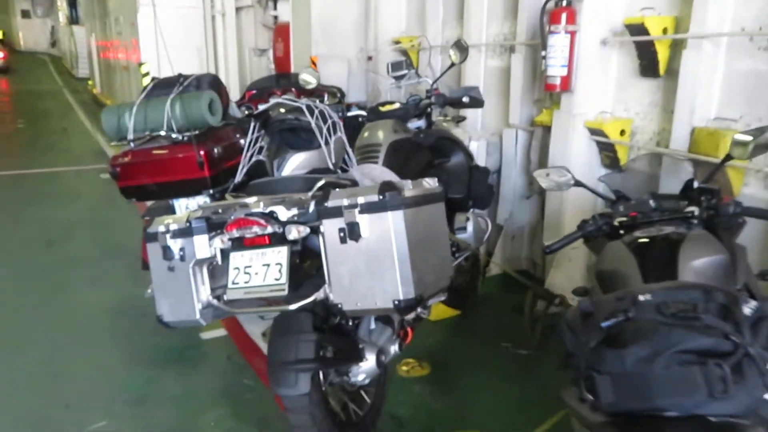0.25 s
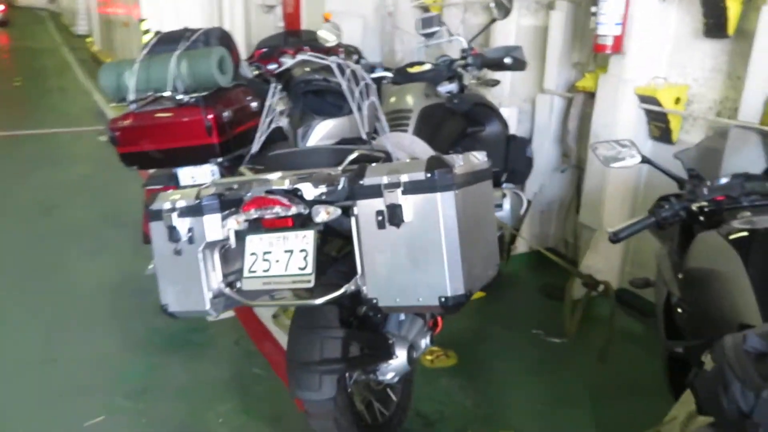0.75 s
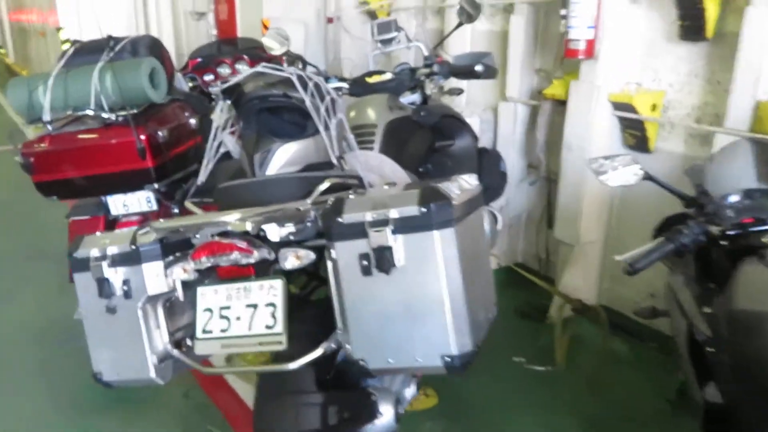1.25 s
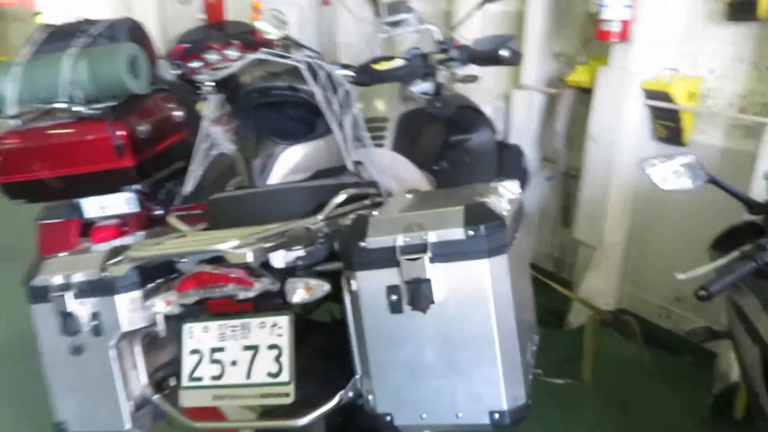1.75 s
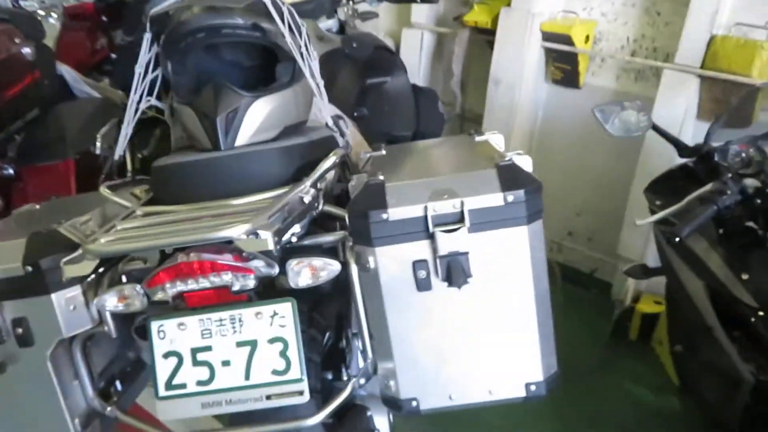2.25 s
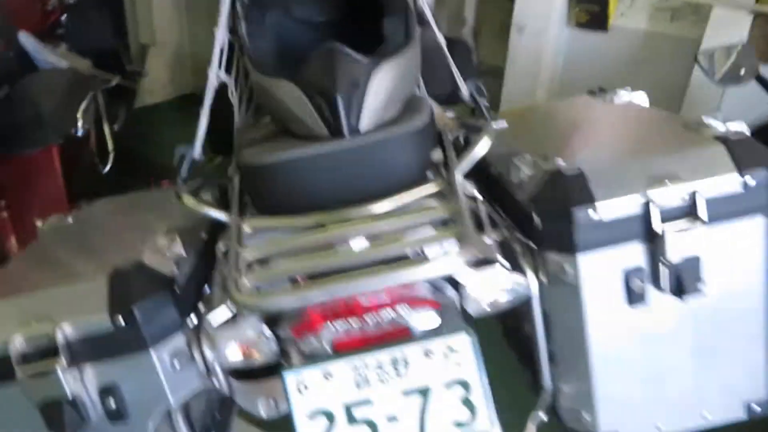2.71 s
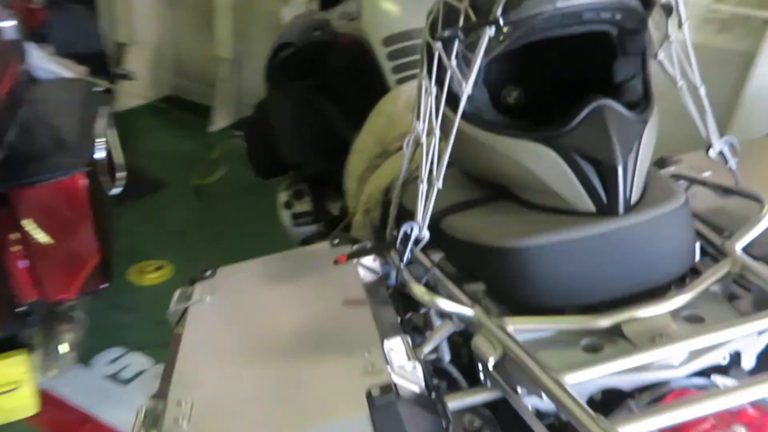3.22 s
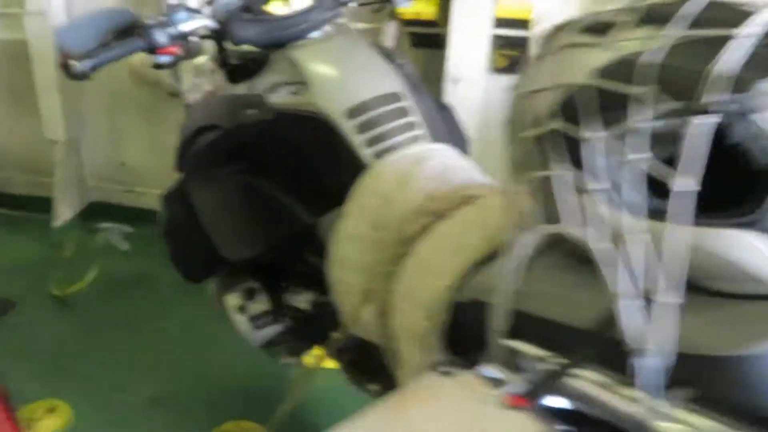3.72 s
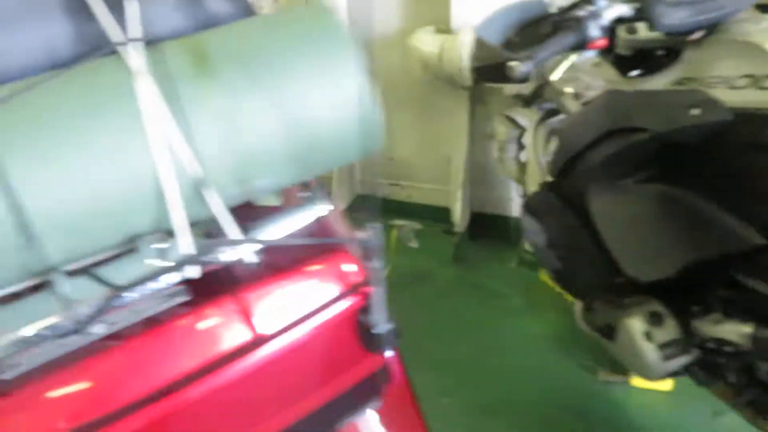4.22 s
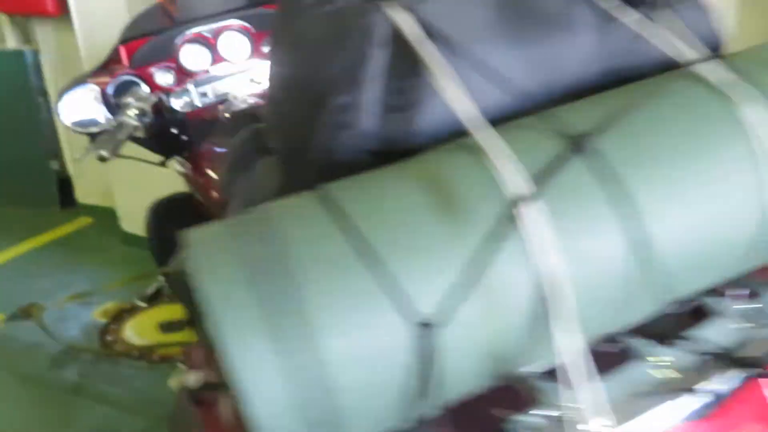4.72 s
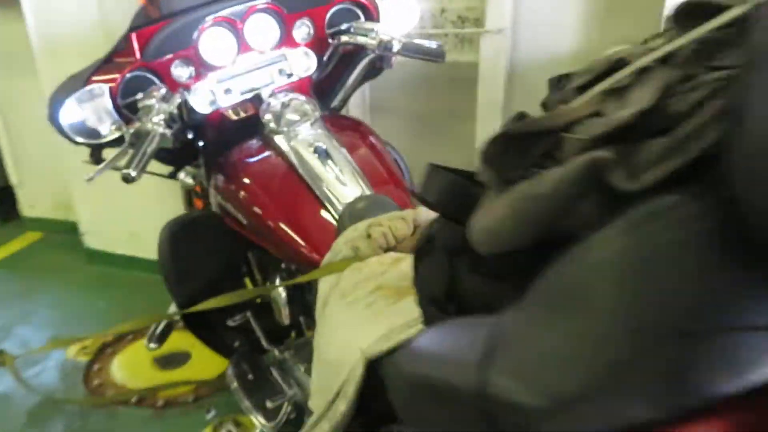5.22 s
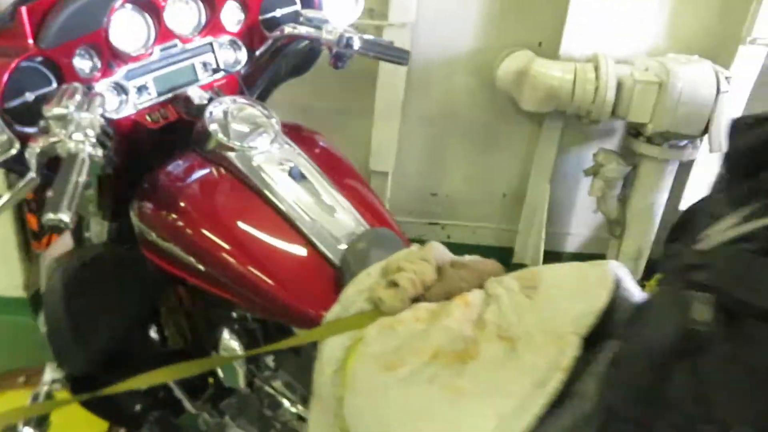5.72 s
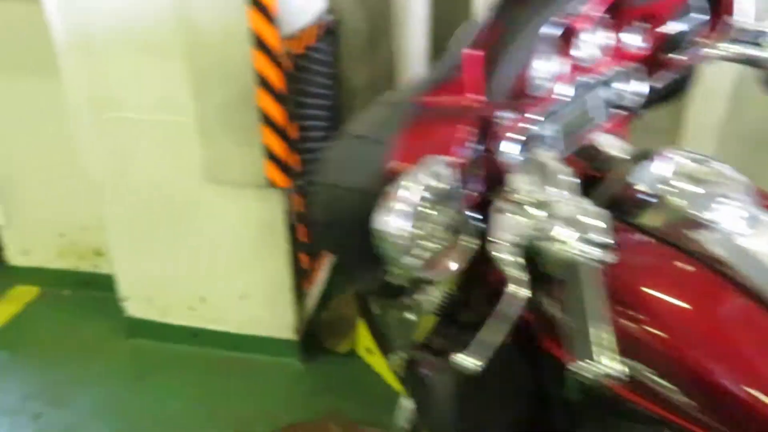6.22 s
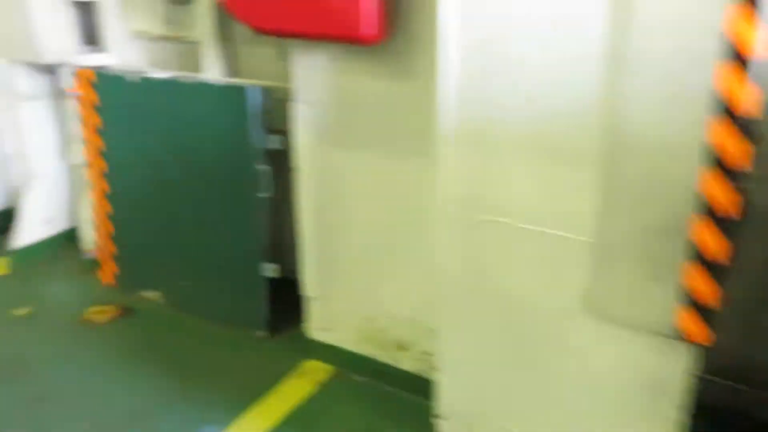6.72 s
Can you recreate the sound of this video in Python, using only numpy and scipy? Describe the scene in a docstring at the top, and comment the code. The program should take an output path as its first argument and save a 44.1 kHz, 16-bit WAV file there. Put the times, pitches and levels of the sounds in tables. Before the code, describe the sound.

Low, thick ship-engine noise dominates from start to end, throbbing irregularly in a reverberant metal hold. Above it sits a muffled ventilation roar with a thin air hiss. The handheld microphone is carried past silent parked motorcycles: a broader hollow air rush around three seconds, soft swishes, a tiny click at about 4.6 seconds, then steady rumble until an abrupt end.

```python
"""Enclosed steel vehicle deck of a ferry under way, heard from a small camera carried between parked motorcycles.
From the start, diesel firings smear into a rumble, booms and throbs; a drone swells between standing-wave nodes.
All through, shaped noise makes duct roar and air hiss; soft rustles and faint narrow-band swells start by 1 s.
Hollow duct openings and hissing grilles pass from about 2.7 s to 4.7 s; one dry, decaying tick falls at 4.6 s.
Throbs, rustles and treble swells near 8 kHz recur up to the short closing fade."""
import sys
import numpy as np
from scipy import signal
from scipy.fft import rfft, irfft
from scipy.io import wavfile
from scipy.ndimage import uniform_filter1d, minimum_filter1d

SR = 44100
rng = np.random.default_rng(int(sys.argv[2]) if len(sys.argv) > 2 else 0)


def master(y):
    """Save y as 16-bit WAV."""
    cut = np.clip(np.atleast_2d(y).T, -1, 1)
    pcm = np.round(cut * 32767)  # scale
    wavfile.write(sys.argv[1], SR, pcm.astype(np.int16))


N = 306620
TIME_S = np.arange(N) / SR
FREQ_HZ = np.maximum(np.arange(N // 2 + 1) * SR / N, 1)


def undb(db):
    """Decibels to amplitude gain."""
    return 10 ** (np.asarray(db) / 20)


def unit(x):
    """Scale to rms 1."""
    return x / np.sqrt(np.mean(x ** 2))


def gains(table):
    """Interpolate the dB columns of a time table into gains per sample."""
    time_s, *columns_db = np.transpose(table)
    return [undb(np.interp(TIME_S, time_s, column_db)) for column_db in columns_db]


def colour(points):
    """Frequency response through (f/Hz, level/dB) points, linear in dB over log frequency."""
    hz, db = np.transpose(points)
    return undb(np.interp(np.log(FREQ_HZ), np.log(hz), db))


def resonance(hz, width_hz):
    """Two identical resonators in series; width_hz is the bandwidth of each."""
    detuning = FREQ_HZ / hz - hz / FREQ_HZ
    return 1 / (1 + 1j * detuning * hz / width_hz) ** 2


def noise():
    """White noise of rms about 1."""
    return rng.standard_normal(N)


def wander(rate_hz):
    """Smooth random signal of rms 1: noise under a Gaussian low-pass, without its mean."""
    lowpass = np.exp(-(FREQ_HZ / rate_hz) ** 2)
    lowpass[0] = 0
    return unit(irfft(rfft(noise()) * lowpass, N))


def hum(hz, waver_rad):
    """Sine of rms 1 whose phase drifts among the reflections."""
    phase_drift = waver_rad * wander(rate_hz=6.8)
    return np.sqrt(2) * np.sin(2 * np.pi * (hz * TIME_S + rng.random()) + phase_drift)


# side response of the stereo picture: f/Hz, level/dB
SIDE_COLOUR = [(55, -9), (110, -8), (180, -2), (380, 3.5), (650, -1), (5000, 0.3), (14000, -0.5)]
PORT_SPACING_M, SOUND_SPEED_M_PER_S = 0.013, 343


def diffuse(source, response, directions=8):
    """Sound from all round the deck: two close ports agree in the bass and part in the treble; rms 1."""
    angles_rad = np.pi / 2 * (np.arange(directions) + .5) / directions
    lags_s = PORT_SPACING_M / SOUND_SPEED_M_PER_S * np.cos(angles_rad)
    likeness = np.mean(np.cos(2 * np.pi * np.outer(lags_s, FREQ_HZ)), axis=0)
    mid = irfft(rfft(unit(source)) * response * np.sqrt(1 + likeness), N)
    side = irfft(rfft(noise()) * response * colour(SIDE_COLOUR) * np.sqrt(1 - likeness), N)
    return unit(np.array([mid + side, mid - side]))


def held(x, seconds):
    """Even out a band's slow swells by its running rms; keep its quick flutter."""
    power = uniform_filter1d(np.mean(x ** 2, axis=0), int(seconds * SR), mode="wrap")
    return x / np.sqrt(power)


# engine rumble spectrum: f/Hz, relative level/dB
RUMBLE_COLOUR = [(15, -15), (26, -13), (38, -8.5), (50, -6), (90, 1.5), (128, -1.5), (170, 1), (220, 1),
                 (275, 0.24), (350, -3.5), (450, -8), (700, -26.5), (1500, -66)]
# deck resonances along the walk: t/s, deep relative level/dB, upper relative level/dB
BOOM_LEVELS = [(0.0, -30, -35), (1.1, -30, -30.5), (1.65, -34, -32), (2.2, -20.5, -34), (2.6, -41, -40),
               (3.1, -27, -28.5), (3.5, -28, -23.5), (4.1, -29, -32), (4.7, -23, -24.5), (5.3, -20, -24.5),
               (5.68, -22, -23.5), (6.2, -35, -30), (6.55, -21.5, -28.5), (6.95, -20, -27)]


def engines(rumble_gain):
    """Diesels shake the hull: a broad rumble plus two booming deck resonances."""
    shaking = firings()
    deep_gain, upper_gain = gains(BOOM_LEVELS)
    rumble = held(diffuse(shaking, colour(RUMBLE_COLOUR)), seconds=0.41)
    deep = held(diffuse(shaking, resonance(hz=64.4, width_hz=34)), seconds=0.78)
    upper = held(diffuse(shaking, resonance(hz=143.7, width_hz=44)), seconds=0.2)
    return (undb(2.0) * rumble_gain * rumble
            + undb(-2.0) * deep_gain * deep
            + undb(2.7) * upper_gain * upper)


CYCLE_HZ = 5.92


def firings(cylinders=6, uneven_db=3, scatter_db=6.5, deck_t60_s=2.35, turbulence_db=2):
    """Unequal cylinders fire in turn; the ringing steel deck smears the blows together."""
    firing_hz = CYCLE_HZ * cylinders
    index = np.arange(int(N / SR * firing_hz))
    cylinder_db = uneven_db * rng.standard_normal(cylinders)
    blow_db = cylinder_db[index % cylinders] + scatter_db * rng.standard_normal(len(index))
    blows = np.zeros(N)
    blows[(index * SR / firing_hz).astype(int)] = undb(blow_db)
    # each cylinder has its own path through the hull
    firing_cylinder = (TIME_S * firing_hz + .5).astype(int) % cylinders
    decay = undb(-60 * TIME_S / deck_t60_s)
    smeared = sum(rfft(blows * (firing_cylinder == k)) * rfft(noise() * decay) for k in range(cylinders))
    return unit(irfft(smeared, N)) + undb(turbulence_db) * noise()


# momentary deck resonances: t/s, f/Hz, half length to 1/e/s, rms level at peak/dB
THROBS = [(0.09, 75, 0.08, -19), (0.61, 270, 0.14, -25.5), (1.078, 68, 0.063, -20.5),
          (1.344, 318, 0.081, -27), (2.416, 255, 0.07, -20), (3.176, 136, 0.048, -17),
          (3.29, 250, 0.15, -27), (3.505, 67.7, 0.095, -18.5), (4.71, 140.6, 0.066, -17.5),
          (5.3, 63.8, 0.1, -19), (5.707, 141, 0.06, -18), (6.69, 70.7, 0.08, -25),
          (6.787, 270.8, 0.15, -22.5), (6.92, 129.4, 0.042, -21)]


def throbs(waver_rad=0.74):
    """A deck resonance builds up for a moment: a short note of unsteady pitch swells and dies."""
    out = 0
    for time_s, hz, length_s, db in THROBS:
        swell = np.exp(-((TIME_S - time_s) / length_s) ** 2)
        out = out + undb(db) * swell * hum(hz, waver_rad)
    return out


DRONE_HZ, FAN_HZ = 132.7, 325.6
# fan hum: first crest, crest spacing, Gaussian sigma, crest level
FAN_CREST_S, FAN_SPACING_S, FAN_SIGMA_S, FAN_CREST_DB = 1.33, 3.18, 0.14, -24.5


def drone(drone_patchy_db=0.45, fan_trough_db=-33.5, fan_patchy_db=2.0):
    """Strongest engine order and a lesser fan hum, each swelling at its own crests."""
    engine_gain = undb(-1.77) * standing_wave() * undb(drone_patchy_db * wander(rate_hz=7))
    engine = engine_gain * hum(DRONE_HZ, waver_rad=.14)
    from_crest_s = (TIME_S - FAN_CREST_S + FAN_SPACING_S / 2) % FAN_SPACING_S - FAN_SPACING_S / 2
    fan_crest = undb(FAN_CREST_DB) * np.exp(-.5 * (from_crest_s / FAN_SIGMA_S) ** 2)
    fan_gain = np.hypot(fan_crest, undb(fan_trough_db)) * undb(fan_patchy_db * wander(rate_hz=16))
    return engine + fan_gain * hum(FAN_HZ, waver_rad=.25)


# drone standing wave: node t/s, relative level of the crest that follows/dB
DRONE_NODES = [(-0.2, -17), (0.39, -26), (0.88, -20), (1.31, -13.5), (1.93, -18), (2.61, -24.5),
               (3.22, -19), (4.42, -21), (4.97, -21), (5.38, -20), (5.84, -20.5)]
LAST_NODE_S = 6.72


def standing_wave(travelling_db=-30, crest_shape=0.77):
    """Drone gain: a broad arch from node to node, over a weak travelling part."""
    nodes_s, crest_db = np.transpose(DRONE_NODES)
    place = np.interp(TIME_S, np.append(nodes_s, LAST_NODE_S), np.arange(len(nodes_s) + 1))
    crest = undb(crest_db)[np.minimum(place.astype(int), len(nodes_s) - 1)]
    arch = np.abs(np.sin(np.pi * place)) ** crest_shape
    return np.hypot(crest * arch, undb(travelling_db))


# machinery tones: f/Hz, rms level at start/dB, rms level at end/dB
MACHINE_TONES = [(33, -45, -38), (38.7, -40, -34.5), (70.5, -38.5, -28.5), (76.3, -35, -42),
                 (114, -40.5, -31.5), (177.8, -29.5, -33), (218.8, -42.5, -31.5), (261.3, -38, -36),
                 (283.3, -33.5, -37), (304.5, -37.5, -37.5), (348.7, -41, -40)]


def machinery(fading=0.36):
    """Weaker tones of shafts, pumps and fans; reflections make each fade on its own."""
    out = 0
    for hz, start_db, end_db in MACHINE_TONES:
        reflections = 1 + fading * (wander(rate_hz=2.8) + 1j * wander(rate_hz=1.1))
        tone = np.real(reflections * np.exp(2j * np.pi * (hz * TIME_S + rng.random())))
        out = out + unit(tone) * undb(np.linspace(start_db, end_db, N))
    return out


# fan roar spectrum: f/Hz, relative level/dB
ROAR_COLOUR = [(150, -31), (350, -3), (460, 0), (605, 1), (652, 3), (700, 0.5), (800, -2.5), (950, -4.5),
               (1200, -10.5), (1500, -14.5), (1900, -21), (3000, -30.5), (6000, -53)]
# air hiss spectrum: f/Hz, relative level/dB
HISS_COLOUR = [(500, -24), (1400, 6.5), (2000, 5), (3200, -1), (4200, -4.5), (5200, -9), (7000, -14.5),
               (8400, -17.5), (9300, -20), (11500, -23), (14800, -36), (16000, -44)]
# duct resonances: f/Hz, width per resonator/Hz, relative level/dB
DUCT_MODES = [(934, 580, 3.5), (1300, 160, 3.5), (1460, 350, -1)]
# passing air openings: nearest t/s, distance/m, half width/m, hollow level/dB, relative hiss level/dB
OPENINGS = [(2.72, 0.09, 0.11, -27, -56), (3.1, 0.2, 0.12, -34.5, -62.5), (3.5, 0.44, 0.073, -48, -42.5),
            (4.65, 0.072, 0.024, -31, -53.5)]


def ventilation(roar_gain, hiss_gain):
    """Fans roar through the ducts, air hisses at the grilles, hollow openings go by."""
    hollow_gain = grille_gain = 0
    for time_s, distance_m, half_width_m, hollow_db, hiss_db in OPENINGS:
        nearness = passing(time_s, distance_m, half_width_m)
        hollow_gain = hollow_gain + undb(hollow_db) * nearness
        grille_gain = grille_gain + undb(hiss_db) * nearness
    roar = undb(0.91) * roar_gain * diffuse(buffeting(), colour(ROAR_COLOUR))
    # turbulence blurs the fan's octave into a rough moan
    moan = undb(-13) * roar_gain * diffuse(noise(), resonance(hz=2 * FAN_HZ, width_hz=27))
    flutter = undb(.55 * wander(rate_hz=30))
    hiss = undb(6.5) * np.hypot(hiss_gain, grille_gain) * flutter * diffuse(noise(), colour(HISS_COLOUR))
    # the slats' bright rush follows the grilles alone
    slat_gain = undb(-2.5) * grille_gain * undb(2.0 * wander(rate_hz=40))
    slats = slat_gain * diffuse(noise(), resonance(hz=3600, width_hz=1300))
    duct_power = sum(np.abs(undb(db) * resonance(hz, width_hz)) ** 2 for hz, width_hz, db in DUCT_MODES)
    surge = undb(1.2 * wander(rate_hz=18))
    hollow = hollow_gain * surge * diffuse(noise(), np.sqrt(duct_power))
    return roar + moan + hiss + slats + hollow


def buffeting(edges_hz=(500, 800, 1200), depth_db=1.13):
    """Turbulent air: each band of eddies surges on its own, giving short uneven lumps."""
    band = np.searchsorted(edges_hz, FREQ_HZ)
    air = rfft(noise())
    out = 0
    for k in range(len(edges_hz) + 1):
        out = out + irfft(air * (band == k), N) * undb(depth_db * wander(rate_hz=27.0))
    return out


WALK_M_PER_S = 1


def passing(time_s, distance_m, half_width_m):
    """Gain of an opening beaming across the path: 1 in front, falling fast beyond its edges."""
    beyond_m = np.maximum(WALK_M_PER_S * np.abs(TIME_S - time_s) - half_width_m, 0)
    return (distance_m / np.hypot(distance_m, beyond_m)) ** 4


# topmost hiss along the walk: t/s, rms level/dB
SHEEN_LEVELS = [(0, -55), (0.42, -70), (0.55, -61.5), (1.41, -60), (1.58, -65), (1.78, -67), (1.88, -60),
                (2.98, -60), (3.36, -50), (4.33, -66), (4.68, -55.5), (5.3, -62), (5.59, -57), (6.02, -70),
                (6.32, -55), (6.6, -59), (6.95, -54)]
# topmost hiss spectrum: f/Hz, relative level/dB
SHEEN_COLOUR = [(3500, -23), (6300, 1), (8500, -.5), (11500, -3.5), (14800, -8), (16000, -20.5)]


def sheen():
    """Thin top of the air hiss: treble noise that comes and goes along the walk."""
    return gains(SHEEN_LEVELS)[0] * diffuse(noise(), colour(SHEEN_COLOUR))


# soft rustles: t/s, half length to 1/e/s, rms level at peak/dB
RUSTLES = [(0.698, .045, -51), (4.03, .06, -48), (4.7, .05, -52), (5.088, .035, -51), (5.45, 0.045, -59),
           (5.68, .04, -54), (6.31, .06, -48), (6.854, .035, -50)]
# rustle spectrum: f/Hz, relative level/dB
RUSTLE_COLOUR = [(1200, -14), (2800, -5), (4500, 2), (6500, -2), (9000, -11), (14000, -19), (16000, -30)]


def rustles(grain_db=5.0):
    """Short swishes: noise made grainy by fast random level changes."""
    swell = sum(undb(db) * np.exp(-((TIME_S - time_s) / length_s) ** 2) for time_s, length_s, db in RUSTLES)
    grains = noise() * undb(grain_db * wander(rate_hz=150))
    return swell * diffuse(grains, colour(RUSTLE_COLOUR))


# faint brief treble swells: t/s, f/Hz, half length to 1/e^2/s, rms level at peak/dB
TREBLE_SWELLS = [(1.07, 8550, .06, -60), (1.9, 8050, .1, -60.5), (2.8, 8450, .07, -63),
                 (3.125, 8500, .055, -56), (4.633, 8460, .008, -44), (5.46, 8600, .05, -61),
                 (6.69, 8150, .06, -58)]


def treble_swells(width_hz=450):
    """Faint brief swells of narrow-band treble noise near 8 kHz."""
    out = 0
    for time_s, hz, length_s, db in TREBLE_SWELLS:
        swell = np.exp(-2 * ((TIME_S - time_s) / length_s) ** 2)
        out = out + undb(db) * swell * diffuse(noise(), resonance(hz, width_hz))
    return out


TICK_S, TICK_DB = 4.601, -13  # onset; peak ahead of the treble cut


def tick(decay_s=.0002):
    """One dry tick: a sudden negative step decaying exponentially, without ring."""
    decay = np.exp(-np.abs(TIME_S - TICK_S) / decay_s)
    return -undb(TICK_DB) * (TIME_S >= TICK_S) * decay


# nearness to machinery and ducts: t/s, relative rumble, roar and hiss level/dB
WALK_LEVELS = [(0.0, -20, -22.5, -47), (0.6, -18.5, -23, -45.5), (1.38, -19, -22, -45.5),
               (1.75, -21.5, -26.5, -50), (2.4, -17.5, -22.5, -44), (2.84, -17.5, -22.5, -47),
               (2.89, -19, -24.5, -50), (3.09, -21.5, -26.5, -50), (3.17, -16.5, -26, -48),
               (3.3, -17, -25.5, -52), (3.9, -23.5, -28, -46.5), (4.25, -21.5, -26.5, -47.5),
               (4.65, -19, -25.0, -45), (5.3, -20, -26.5, -47.5), (5.5, -17.5, -26.5, -46),
               (5.97, -24, -27, -47.5), (6.35, -18.5, -24.5, -45.5), (6.95, -18, -24.5, -46)]


def scene():
    """Sum engines and ventilation as they reach the moving camera, with the small sounds."""
    rumble_gain, roar_gain, hiss_gain = gains(WALK_LEVELS)
    below_deck = engines(rumble_gain) + throbs() + drone() + machinery()
    air = ventilation(roar_gain, hiss_gain) + sheen()
    return below_deck + air + rustles() + treble_swells() + tick()


CEILING, FADE_S, TOP_HZ = .75, .006, 15200


def record(dry):
    """The camera eases its gain down on the highest crests and cuts the top treble; the ends fade."""
    room_left = np.minimum(1, CEILING / np.maximum(np.abs(dry).max(axis=0), 1e-9))
    gain = uniform_filter1d(minimum_filter1d(room_left, size=441), size=441)  # 10 ms windows
    fade = np.minimum(1, np.minimum(TIME_S, TIME_S[::-1]) / FADE_S)
    treble_cut = signal.ellip(8, .05, 60, TOP_HZ, fs=SR, output="sos")
    return signal.sosfiltfilt(treble_cut, dry * gain * fade)


dry = scene()
out = record(dry)
master(out)
```